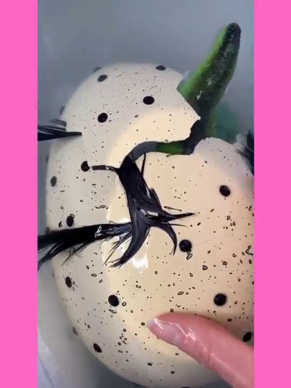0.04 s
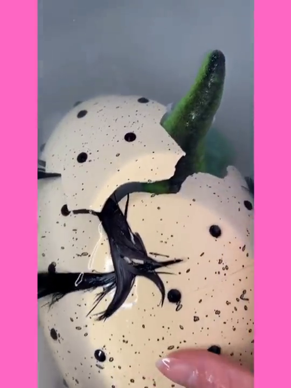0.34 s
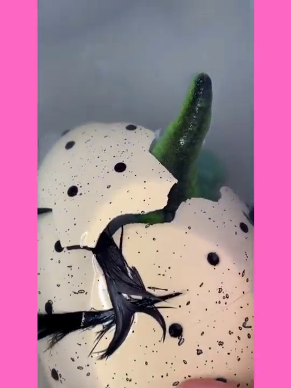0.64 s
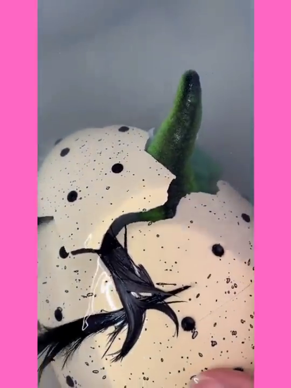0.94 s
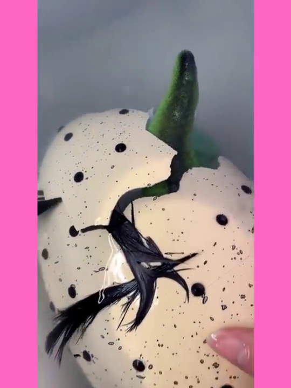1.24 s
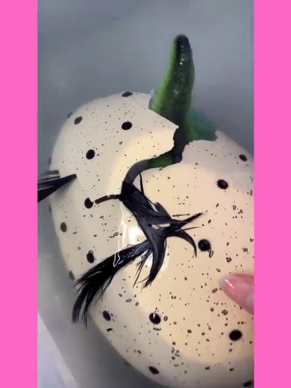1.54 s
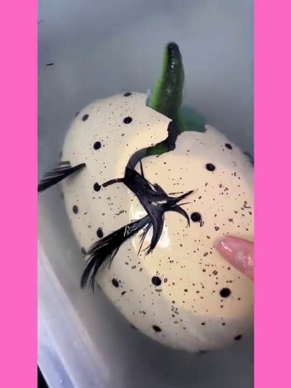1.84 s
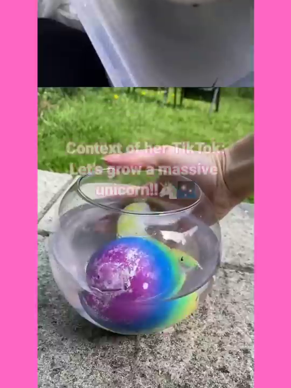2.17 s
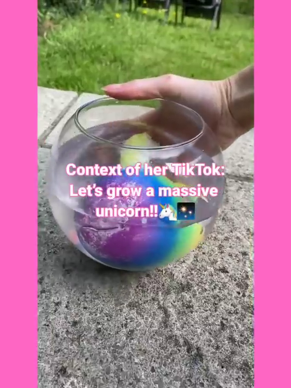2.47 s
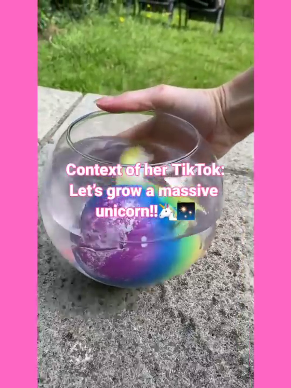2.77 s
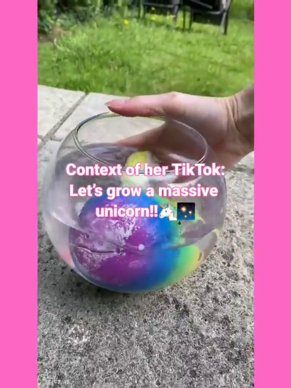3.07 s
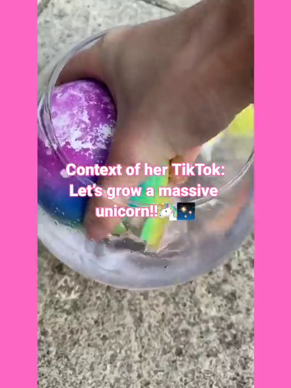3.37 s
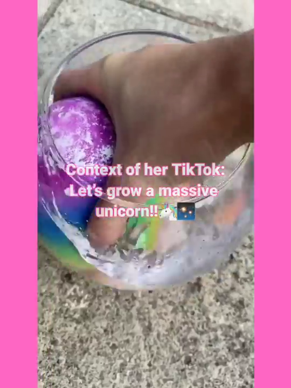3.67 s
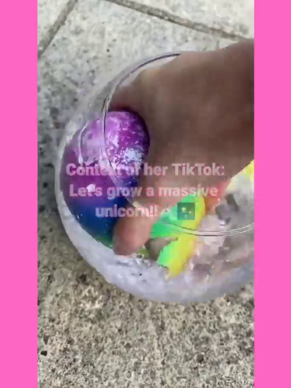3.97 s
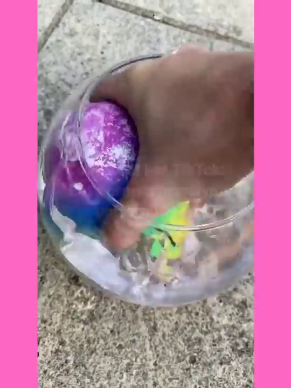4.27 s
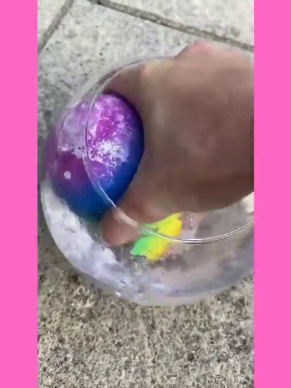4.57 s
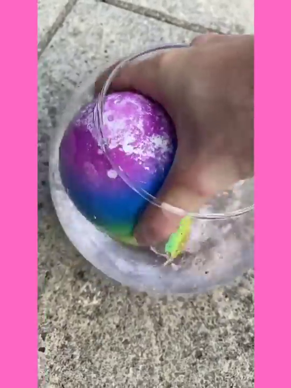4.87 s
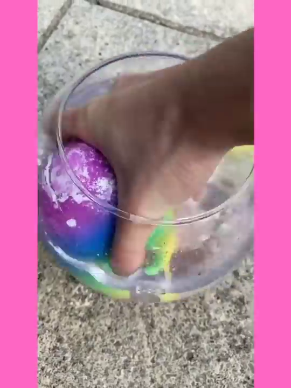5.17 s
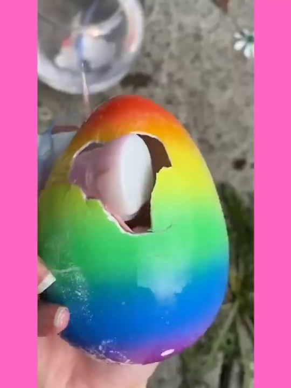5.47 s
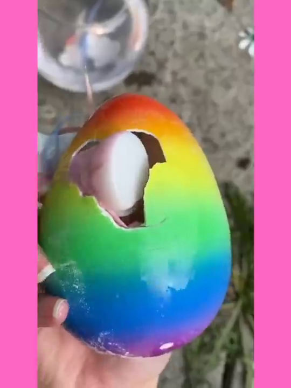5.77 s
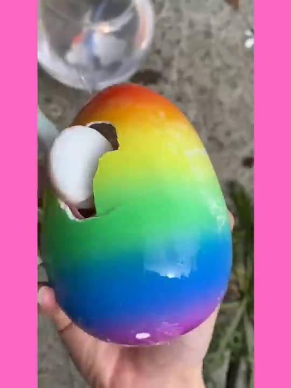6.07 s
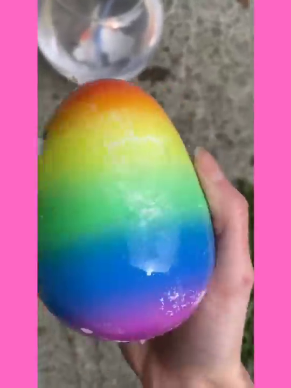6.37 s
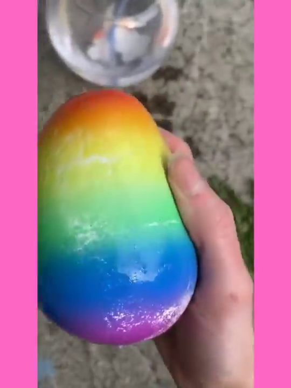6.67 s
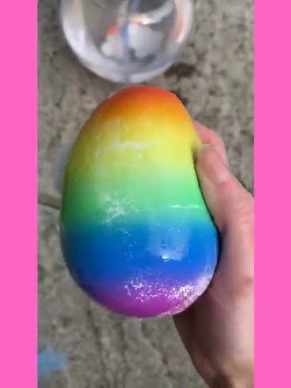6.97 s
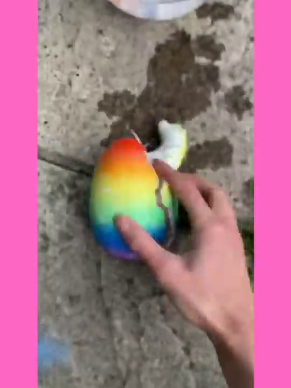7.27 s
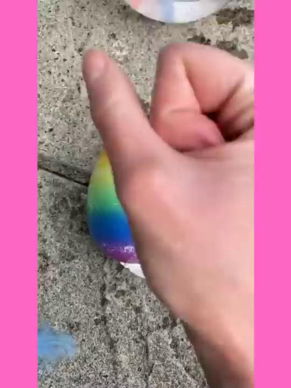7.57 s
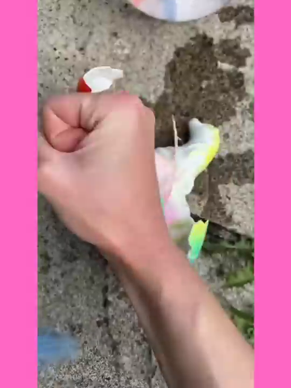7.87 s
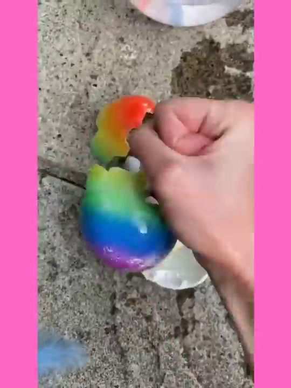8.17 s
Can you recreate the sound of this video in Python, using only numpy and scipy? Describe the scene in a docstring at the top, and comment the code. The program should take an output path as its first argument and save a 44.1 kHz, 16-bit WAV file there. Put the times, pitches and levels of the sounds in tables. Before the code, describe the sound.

Fingertips tap lightly on a big soaking toy egg in a quiet room. Outdoors, a glass bowl scrapes and judders over gritty paving. Close to the microphone, a hand crushes an egg underwater in the bowl, with sharp cracks, sloshing, bubbles and little spurts. Out of the water, the hollow shell gives scattered dry cracks, then is smashed three times on the slabs, its pieces rustling. Light wind rumbles on the microphone.

```python
"""Toy eggs are opened by hand. First, fingertips tap a big soaking egg in a quiet room. From 2.15 s, outdoors
in light wind, a glass bowl sticks and slips over gritty paving. From 3.1 s an egg is crushed under water in the
bowl: fractures ring the air inside the egg, water and air spurt through the cracks, the water sloshes and
bubbles ring. From 5.7 s the hollow shell cracks as it is squeezed in the air. At 7.33 s the whole egg lands on
the slabs, then it is smashed twice, each impact trailed by a short grainy wash."""
import sys
import numpy as np
from scipy import signal
from scipy.fft import rfft, irfft, next_fast_len
from scipy.io import wavfile
from scipy.ndimage import uniform_filter1d

SR = 44100
rng = np.random.default_rng(int(sys.argv[2]) if len(sys.argv) > 2 else 0)


def digitize_waveform(pressure):
    """Quantize a signal to 16-bit integers and store it at the path in sys.argv[1].

    Rows of a 2-D input are taken as channels; values are limited to [-1, 1].
    """
    field = np.atleast_2d(pressure).T
    bounded = np.clip(field, -1, 1)
    quanta = np.round(bounded * 32767).astype(np.int16)
    wavfile.write(sys.argv[1], SR, quanta)


N = 370881
TIME_S = np.arange(N) / SR
HIT_S = TIME_S[:SR // 6]  # time axis of one short event
OUTDOORS_S, HAND_IN_S, LIFTED_S = 2.15, 3.38, 5.53


def cracks(rows, modes, spectrum, scatter, rise_s, crumbs_db, crumbs_s, fade_in_db, ripple_db,
           body=lambda x: x):
    """Each crack fades in briefly, peaks and dies away; the sudden release rings the hollow shell."""
    out, lead_s, fade_in_s = np.zeros(N), .008, .0018
    t = HIT_S - lead_s
    for s, snap_db, ring_db, tear_s, *pitch_hz in rows:
        before = gain_of(fade_in_db) * np.exp(-abs(t) / fade_in_s)
        after = np.exp(-abs(t) / max(tear_s, .0005)) + gain_of(crumbs_db) * np.exp(-abs(t) / crumbs_s)
        slips = grains(9000, 5.6, len(t)) * np.where(t < 0, before, after)
        push = scatter * slips / np.linalg.norm(slips)
        push[round(lead_s * SR)] += 1
        tuning = pitch_hz[0] / modes[0][0] if pitch_hz else 1
        shell = sum(gain_of(db - 60 * HIT_S / t60_s)
                    * np.sin(2 * np.pi * hz * tuning * rng.uniform(0.97, 1.02) * HIT_S)
                    for hz, db, t60_s in modes)
        ring = signal.fftconvolve(push, shell * attack(rise_s))[:len(t)]
        snap = body(colour(slips, spectrum, ripple_db))
        add(out, s - lead_s, sized(snap, snap_db) + sized(ring, ring_db))
    return out


# Breaks under water (time [s], snap [dB], ring [dB], tear [s], pitch [Hz])
WET_CRACKS = [(3.121, -32.5, -52, 0.016, 730), (3.427, -35.5, -34, 0.0037, 730),
              (3.454, -19.5, -27, 0.0061, 729), (3.577, -22, -22.5, 0.012, 765),
              (3.641, -25.5, -48, 0.0027, 736), (3.684, -21, -11, 0.0034, 698),
              (3.922, -22, -23.5, 0.0024, 724), (3.957, -20.5, -26, 0.0011, 730),
              (4.072, -15.5, -23.5, 0.0063, 750), (4.115, -12, -21, 0.005, 770),
              (4.163, -28, -13, 0.0034, 756), (4.269, -26, -25.5, 0.0016, 719),
              (4.323, -12.5, -32.5, 0.0086, 744), (4.351, -17.5, -26.5, 0.016, 716),
              (4.421, -25, -4.5, 0.006, 722), (4.57, -24, -16, 0.0026, 732), (4.62, -17, -29, 0.0038, 746),
              (4.671, -40.5, -20, 0.011, 680), (4.759, -19, -19.5, 0.0039, 690),
              (4.816, -28.5, -42.5, 0.005, 726), (5.093, -31.5, -33, 0.0039, 743),
              (5.204, -46, -23, 0.0073, 789), (5.267, -19.5, -32, 0.003, 730),
              (5.426, -17, -21.5, 0.01, 732), (5.466, -28.5, -39.5, 0.0066, 730)]
# Hand squeezes (time [s], length [s], level [dB])
SQUEEZES = [(3.562, 0.21, -33.5), (3.864, 0.057, -26.5), (3.97, 0.043, -48), (4.059, 0.15, -34.5),
            (4.304, 0.063, -27), (4.368, .11, -34.5), (4.514, 0.14, -31.5), (4.666, 0.18, -42.5),
            (5.17, 0.07, -35), (5.434, 0.025, -44)]
# Modes of the air inside the submerged egg (frequency [Hz], level [dB], t60 [s])
WET_MODES = [(720, 9.5, 0.043), (1120, -2, 0.036), (1530, -10.5, 0.024), (1890, -13.5, 0.028)]
# Wet snap spectrum (frequency [Hz], level [dB])
WET_SNAP = [(600, -6), (1500, -6.5), (2300, -2), (2950, -6.5), (3800, 5), (4400, 4.5), (4950, -3),
            (5600, 2), (7500, 4.5), (11000, 0), (13000, -3.5), (14000, -26.5)]


def wet_cracking(splinters_per_s=35, splinter_s=0.0021, spread_db=6):
    """The shell breaks under water in the bowl; squeezes add lesser splinters."""
    rows = list(WET_CRACKS)
    for s, length_s, db in SQUEEZES:
        for place, snap, ring in rng.uniform(-0.91, 1, (12, 3))[:round(length_s * splinters_per_s)]:
            at_s = s + SURGE_S / 2 + length_s * (place + 1) / 2
            snap_db = db - 2.5 + spread_db * snap
            ring_db = db - 6.5 + spread_db * ring
            rows.append((at_s, snap_db, ring_db, splinter_s, WET_MODES[0][0]))
    return cracks(rows, WET_MODES, WET_SNAP, scatter=0.99, rise_s=0.00012, crumbs_db=-47.5,
                  crumbs_s=0.0167, fade_in_db=-1, ripple_db=5.5, body=glass)


# Breaks in the air (time [s], snap [dB], ring [dB])
DRY_CRACKS = [(3.276, -32, -26.5), (3.285, -30.5, -24), (3.782, -29.5, -20.5), (5.722, -58, -35.5),
              (5.782, -25.5, -15), (6.06, -28, -34), (6.093, -36, -30.5), (6.326, -37.5, -28),
              (6.38, -25, -14.5), (6.54, -32, -32.5), (6.816, -40, -31.5), (6.835, -32.5, -36),
              (6.841, -31, -22), (6.99, -33, -30.5)]
# Shell modes in the air (frequency [Hz], level [dB], t60 [s])
DRY_MODES = [(1018, 14.5, 0.019), (1395, 3, 0.016), (2110, -7.5, 0.014), (2620, -3, 0.017),
             (3480, -3, 0.018), (4350, -8.5, 0.014)]
# Dry snap spectrum (frequency [Hz], level [dB])
DRY_SNAP = [(300, -0.5), (1500, 2), (2450, -1), (3300, -2), (4300, -1), (4900, -10.5), (5500, -3.5),
            (7200, -13), (8500, -16.5), (12000, -32.5), (14000, -36)]


def dry_cracking(clean_db=-22.5, clean_s=0.0027):
    """Clear of the water, strong cracks break cleanly and weak ones tear slowly."""
    rows = [(s, snap_db, ring_db, clean_s * gain_of(0.25 * (clean_db - ring_db)))
            for s, snap_db, ring_db in DRY_CRACKS]
    return cracks(rows, DRY_MODES, DRY_SNAP, scatter=0.46, rise_s=0.002, crumbs_db=-27.5,
                  crumbs_s=0.022, fade_in_db=-14.5, ripple_db=2.5)


# Breaks and rebounds as the egg lands and under two blows (time [s], snap [dB], ring [dB], tear [s], pitch
# [Hz])
SMASHES = [(7.333, -15.5, -7.5, 0.006, 1173), (7.345, -24, -20, 0.0018, 1144),
           (7.835, -30.5, -24, 0.0031, 1270), (7.842, -24, -20.5, .002, 1230),
           (7.851, -26, -7.5, 0.0066, 1258), (7.861, -25.5, -21, 0.00257, 1120),
           (8.138, -39, -25, 0.00356, 1450), (8.15, -20, -14, 0.0014, 1406),
           (8.157, -32.5, -21, .003, 1320), (8.174, -33, -28, 0.0056, 1240),
           (8.189, -35.5, -31.5, 0.0027, 1050)]
# Light knocks and short echoes around the smashes (time [s], snap [dB], ring [dB], pitch [Hz])
KNOCKS = [(7.258, -35.5, -55, 1310), (7.364, -35.5, -26.5, 1050), (7.422, -48, -34, 1170),
          (7.697, -29.5, -33.5, 2290), (7.704, -34, -34, 2180), (7.916, -55, -40, 2120),
          (8.028, -39, -34.5, 734), (8.035, -39, -55, 750), (8.081, -55, -32, 990)]
# Modes of the hollow shell and of its shards (frequency [Hz], level [dB], t60 [s])
WHOLE_MODES = [(1170, 2.5, 0.049), (1490, 3, 0.0113), (2207, 7.5, 0.018), (2376, 5.5, 0.014),
               (3070, -3, 0.014), (3360, -4, 0.019)]
SHARD_MODES = [(1210, 2.5, 0.027), (850, 1.5, 0.0075), (1422, 12, 0.012), (1790, 14, 0.0045),
               (2134, -0.5, 0.022), (2400, -5, 0.018)]
# Smash snap spectrum (frequency [Hz], level [dB])
SMASH_SNAP = [(200, 8.5), (1200, -3.5), (2600, -1), (3700, 4.5), (4900, -2.5), (6000, 0), (8000, -6.5),
              (12500, -17.5), (14000, -20.5)]


def smashing(knock_s=0.0027):
    """The egg landing whole rings the hollow shell; later blows and light knocks ring with the shard modes."""
    whole = cracks(SMASHES[:2], WHOLE_MODES, SMASH_SNAP, scatter=1, rise_s=0.00025, crumbs_db=-24.5,
                   crumbs_s=0.025, fade_in_db=-15, ripple_db=4.5)
    knocks = [(s, snap_db, ring_db, knock_s, hz) for s, snap_db, ring_db, hz in KNOCKS]
    shards = cracks(SMASHES[2:] + knocks, SHARD_MODES, SMASH_SNAP, scatter=0.87, rise_s=0.00025,
                    crumbs_db=-13, crumbs_s=0.014, fade_in_db=-6, ripple_db=4)
    return whole + shards


# Wash spectrum (frequency [Hz], level [dB])
WASH = [(300, 9), (1200, 5.5), (2600, -1), (4800, -3), (6500, -2), (9000, -7.5), (11000, -31), (14000, -33)]
# Pieces shifting on the paving (time [s], level [dB], length [s], centre [Hz])
RUSTLES = [(7.42, -41.5, .08, 6460), (7.42, -39, 0.052, 1210), (7.537, -49, 0.0028, 8400),
           (8.2, -36.5, 0.057, 2320), (8.31, -39, 0.11, 2700)]
# Rustle spectrum (frequency [x centre], level [dB])
RUSTLE_SHAPE = [(.2, -9), (.6, -2.5), (1.1, 1), (1.7, -10), (3, -34)]


def smash_tails(wash_db=-16.5, decay_s=0.051):
    """A dense, grainy wash dies away quickly after each smash; broken pieces slide and rustle on."""
    power = sum(gain_of(2 * snap_db) * (TIME_S > s) * np.exp(-abs(TIME_S - s) * 2 / decay_s)
                for s, snap_db, *_ in SMASHES)
    wash = crackle(WASH, per_s=6500, clump_db=8.5, clump_hz=45, ripple_db=5.5)
    rustles = bursts(RUSTLES, RUSTLE_SHAPE, per_s=2500, spread_db=2.5, clump_db=3.5, ripple_db=2.5,
                     rise_s=.004, fade_s=0.012)
    return gain_of(wash_db) * np.sqrt(power) * wash + rustles


SURGE_S, SETTLE_S, LAPPING_DB = 0.016, 0.033, -45
# Spray spectrum (frequency [Hz], level [dB])
SLOSH = [(250, 11.5), (480, 12.5), (740, -1), (950, -22.5), (1150, -16), (1900, -17), (2350, -6),
         (3000, -14.5), (4400, -12.5), (7500, -11), (9500, -14), (12500, -22), (14000, -30.5)]


def sloshing(spray_db=-0.5, fizz_db=-11, bubbles_per_s=850):
    """Spray and small bubbles surge with each squeeze, then settle to a gentle lapping."""
    surges = sum(gain_of(db) * np.clip((TIME_S - s) / SURGE_S, 0, 1)
                 * np.exp(-np.maximum(TIME_S - s - length_s, 0) / SETTLE_S)
                 for s, length_s, db in SQUEEZES)
    stirring = (surges + gain_of(LAPPING_DB)) * envelope([(HAND_IN_S, 0), (LIFTED_S, 0)])
    spray = glass(crackle(SLOSH, per_s=3000, clump_db=28.5, clump_hz=34.5, ripple_db=8.5, spots=8))
    pitches_hz = np.geomspace(640, 6000, num=24) * rng.uniform(.95, 1.05, 24)
    fizz = np.zeros(N)
    for hz in pitches_hz:
        births = grains(bubbles_per_s / len(pitches_hz), 3.3)
        fizz += signal.oaconvolve(births, bubble(hz, t60_s=0.047 * (1000 / hz) ** .5, glide=0.015))[:N]
    return stirring * (gain_of(spray_db) * unit_rms(spray) + gain_of(fizz_db) * unit_rms(fizz))


def bubble(hz, t60_s, glide):
    """A pocket of air rings and rises in pitch as it nears the surface."""
    return sweep(hz * (1 + glide * HIT_S / t60_s)) * gain_of(-60 * HIT_S / t60_s) * attack(0.00073)


# Large air bubbles (time [s], level [dB], pitch [Hz])
BUBBLES = [(3.608, -5, 466), (3.721, -18.5, 1665), (3.742, -14, 720), (3.852, -14, 2400),
           (3.877, -16.5, 700), (3.9, -15.5, 755), (3.935, -9.5, 697), (4.023, -20, 2300),
           (4.06, -20.5, 2420), (4.089, -18.5, 1120), (4.106, -8.5, 2640), (4.165, -7, 334),
           (4.335, -10.5, 1556), (4.353, -12.5, 1134), (4.353, -12, 430), (4.425, -11, 1120),
           (4.461, -23.5, 2410), (4.568, -10, 390), (4.622, -16, 1120), (4.671, -7, 696),
           (4.672, -11.5, 1005), (4.758, -9.5, 406), (4.87, -15, 1162), (5.204, -13, 720),
           (5.212, -11, 416)]


def large_bubbles():
    """Each large bubble rings while the water around it churns."""
    out = np.zeros(N)
    for s, db, hz in BUBBLES:
        churn = slow_noise(0.2 * hz, len(HIT_S)) * np.sin(2 * np.pi * hz * HIT_S)
        churn *= attack(0.0017) * np.exp(-HIT_S / 0.0085)
        add(out, s, gain_of(db) * (0.87 * bubble(hz, t60_s=0.033, glide=0.016) + 0.36 * churn))
    return out


# Jets from the shell (time [s], level [dB], length [s], centre [Hz])
SPURTS = [(3.294, -32.5, .014, 10400), (3.596, -22.5, .012, 9000), (3.72, -33.5, 0.012, 7060),
          (4.058, -34, .004, 7000), (4.2, -29, .035, 5530), (4.504, -38, .003, 10600),
          (4.517, -29.5, .006, 6500), (4.533, -31, 0.0045, 7250), (4.55, -29.5, 0.0043, 7910),
          (4.605, -32, .004, 10000), (4.745, -30.5, 0.0065, 4860), (4.976, -37.5, .006, 5570),
          (5.176, -33, 0.0252, 8050), (5.238, -36, 0.0021, 7080)]
# Jet spectrum (frequency [x centre], level [dB])
SPURT_SHAPE = [(.15, -23), (.55, -7.5), (1, -1), (1.4, -13), (2.2, -20.5)]


def spurting():
    """Water and air spurt through the cracks."""
    return bursts(SPURTS, SPURT_SHAPE, per_s=6400, spread_db=5, clump_db=6, ripple_db=6.5,
                  rise_s=0.0013, fade_s=0.0018)


# Ringing tones of the water and air between egg, hand and glass (frequency [Hz], width [Hz], gain [dB])
HOLLOW_TONES = [(1135, 24, 4), (1508, 22, 9), (1864, 14, 4.5), (2196, 25, 1.5), (2366, 28, 5.5),
                (3670, 69, 4)]


def hollow_ringing(x):
    """The water and air held between egg, hand and glass ring."""
    return resonate(x, HOLLOW_TONES)


# Pull on the bowl (time [s], effort [dB])
DRAG = [(2.15, -44.5), (2.19, -25.5), (2.212, -43), (2.348, -27), (2.398, -36.5), (2.426, -18),
        (2.756, -25.5), (2.93, -23), (3.0, -51.5)]
# Coarse grit crushed (time [s], level [dB], length [s])
GRIT = [(2.184, -26.5, 0.01), (2.24, -25, 0.022), (2.312, -26.5, 0.015), (2.35, -35.5, 0.0043),
        (2.39, -28, 0.007), (2.456, -23, 0.0074), (2.468, -20, 0.0077), (2.481, -17, .01),
        (2.515, -18, 0.013), (2.536, -17, 0.01), (2.571, -9, 0.027), (2.62, -23.5, 0.012),
        (2.725, -13, 0.028), (2.814, -16.5, 0.016), (2.852, -21, 0.008), (2.872, -14, 0.0074),
        (2.899, -14.5, .016)]
# Grinding and juddering spectra (frequency [Hz], level [dB])
GRIND = [(290, -21), (500, -2.5), (606, -12.5), (810, 7), (1160, -4), (1680, -1), (1880, -11), (2920, -12),
         (3690, -12), (3960, -1.5), (4600, -11.5), (5980, -2), (8220, -6.5), (10500, -6.5), (12900, -13),
         (13700, -27.5)]
JUDDER = [(29, -43), (50, -16), (86, -11.5), (151, -1.5), (228, 0.5), (328, -0.5), (440, -19), (600, -29),
          (1100, -79.5)]


def bowl_drag(grind_db=-12.5, judder_db=1, bite_s=0.002, crush_s=0.009):
    """Glass sticks and slips on sand grains, and the heavy bowl judders with the slips."""
    slipping, effort = slow_noise(47), envelope(DRAG)
    sand = crackle(GRIND, per_s=7000, clump_db=8, clump_hz=39.6, ripple_db=4) * gain_of(2 * slipping)
    out = gain_of(grind_db) * abs(effort) ** 0.81 * unit_rms(glass(sand))
    lead_s = .04
    t = HIT_S - lead_s
    for s, db, length_s in GRIT:
        pressure = np.exp(np.minimum(t, 0) / bite_s - np.maximum(t - length_s, 0) / crush_s)
        crushed = grains(7000, 2.8, len(t)) * pressure * gain_of(2.5 * slow_noise(220, len(t)))
        add(out, s - lead_s, sized(glass(colour(crushed, GRIND, ripple_db=6.5)), db))
    judder = unit_rms(colour(rng.standard_normal(N) * gain_of(2.5 * slipping), JUDDER))
    return out + gain_of(judder_db) * effort * judder


# Bowl resonances (frequency [Hz], width [Hz], gain [dB])
BOWL = [(850, 80, -6), (1680, 47, 6), (4100, 120, 1.5), (5250, 200, 6.5), (5730, 100, 4), (6190, 200, 5),
        (6590, 120, 5.5), (10500, 250, 3)]


def glass(x):
    """The bowl colours whatever sounds in it or against it."""
    return resonate(x, BOWL)


# Fingertip taps (time [s], ring [dB])
TAPS = [(0.05, -38), (0.134, -40.5), (0.278, -32), (0.294, -36), (0.38, -42), (0.503, -33), (0.514, -37.5),
        (0.738, -33.5), (0.751, -37), (0.928, -48), (1.066, -41), (1.074, -34), (1.289, -33), (1.303, -37),
        (1.373, -43), (1.514, -31.5), (1.586, -35.5), (1.712, -32), (1.724, -39), (1.778, -34.5),
        (1.907, -31), (1.916, -36), (2.036, -40), (2.114, -31.5), (2.123, -38.5)]
# Big egg modes (frequency [Hz], level [dB], t60 [s])
EGG_MODES = [(560, 3.5, 0.016), (907, 1, 0.016), (1260, -2.5, 0.013), (1503, -2.5, 0.012),
             (2354, -3.5, 0.0082)]
# Nail tick spectrum (frequency [Hz], level [dB])
TICK = [(1500, -5.5), (2800, -8), (4500, -8.5), (5400, -6), (6800, -10), (7600, -23), (10000, -34.5),
        (14000, -51)]
# A nail just catching the shell (time [s], level [dB], length [s], centre [Hz])
NAIL_GRAZE = (1.401, -57, .001, 5000)


def tapping(firm_db=-32, contact_s=0.00172):
    """Each tap knocks the soaking egg and sets it bobbing; firm taps are brighter and tick more."""
    out = np.zeros(N)
    for s, ring_db in TAPS:
        firmness_db = ring_db - firm_db
        modes = [(hz, db + 0.31 * firmness_db * np.log2(hz / EGG_MODES[0][0]), t60_s)
                 for hz, db, t60_s in EGG_MODES]
        tick_db = -42.5 + 2.45 * firmness_db
        out += cracks([(s, tick_db, ring_db, contact_s)], modes, TICK, scatter=0.83, rise_s=0.0016,
                      crumbs_db=-16, crumbs_s=0.022, fade_in_db=-13, ripple_db=4)
    out += bursts([NAIL_GRAZE], SPURT_SHAPE, per_s=9000, spread_db=6, clump_db=0, ripple_db=6.5,
                  rise_s=.0003, fade_s=.001)
    bobs = [(s + 0.013, 0.23 * ring_db - 26, 185) for s, ring_db in TAPS]
    return out + thuds(bobs, rise_s=0.002, fall=0.074, tail_db=-3.5, tail_s=0.033)


# Soft bumps of hand and egg (time [s], level [dB], pitch [Hz])
BUMPS = [(3.466, -16, 102), (3.625, -6.5, 122.9), (3.705, -10.5, 147.6), (4.29, -12, 133),
         (4.473, -14, 101), (4.972, -15, 84.2), (5.018, -10, 121), (6.054, -19.5, 139.6),
         (6.13, -21.5, 177), (6.304, -17.5, 172.5), (6.322, -17, 58), (6.656, -16.5, 98.2),
         (6.681, -15.5, 117.2), (6.893, -19.5, 128.5), (7.31, -17.5, 166.6), (8.212, -20, 124.3),
         (8.384, -15, 103.5)]


def bumping(heave_hz=222, fist_hz=150):
    """Hand and egg bump, wet cracks shove the water, and the hand's weight lands behind each blow."""
    heaves = [(s, 0.65 * ring_db - 9, heave_hz) for s, _, ring_db, *_ in WET_CRACKS]
    fists = [(s, ring_db - 14, fist_hz) for s, _, ring_db, *_ in SMASHES]
    return thuds(BUMPS + heaves + fists, rise_s=0.0038, fall=0.5, tail_db=-1.5, tail_s=0.0225)


def thuds(rows, rise_s, fall, tail_db, tail_s):
    """A soft push swells, sinks in pitch and leaves a wobble."""
    out = np.zeros(N)
    for s, db, hz in rows:
        tone = sweep(hz * (1 - fall + 2 * fall * np.exp(-HIT_S / 0.0095)))
        push = (HIT_S / rise_s) ** 2 * np.exp(2 - 2 * HIT_S / rise_s) * tone
        wobble = slow_noise(49, len(HIT_S)) * np.sin(2 * np.pi * 0.626 * hz * HIT_S)
        wobble *= attack(rise_s) * np.exp(-HIT_S / tail_s)
        add(out, s, gain_of(db) * (push + gain_of(tail_db) * wobble))
    return out


# Finger slides (time [s], length [s], level [dB], start [Hz], end [Hz])
SLIDES = [(2.917, 0.17, -49, 4220, 4130), (6.569, 0.25, -47.5, 4400, 3440)]


def skin_slides(hiss_width_hz=1200, squeak_width_hz=160):
    """Skin on smooth shell: a squeak in a narrow hiss that sinks as the finger slows."""
    out = np.zeros(N)
    for s, length_s, db, start_hz, end_hz in SLIDES:
        count = int(length_s * SR)
        friction = slow_noise(hiss_width_hz, count) + slow_noise(squeak_width_hz, count)
        squeak = friction * sweep(np.linspace(start_hz, end_hz, count))
        add(out, s, gain_of(db) * unit_rms(squeak * np.hanning(count)))
    return out


# Wind strength (time [s], relative level [dB])
WIND = [(3.0, -37.5), (3.48, -38.5), (3.57, -34), (4.11, -41), (4.45, -30), (5.21, -35.5), (5.73, -45.5),
        (6.77, -37.5), (7.35, -41.5), (7.84, -34.5), (8.41, -35)]
# Room, wind and garden spectra (frequency [Hz], level [dB])
ROOM = [(15, -24.5), (25, 10.5), (120, -1.5), (203, -2.5), (342, -14.5), (1110, -22.5), (1690, -25.5),
        (9500, -36), (13000, -57)]
RUMBLE = [(25, -35), (48, 1), (75, 4.5), (276, -12.5), (400, -20), (700, -89)]
GARDEN = [(180, -18.5), (300, 3), (481, -7), (640, -4.5), (1060, -7.5), (2260, -12.5), (4050, -16),
          (7600, -29), (13000, -54)]


def air(room_db=-56.5, wind_db=-1, gust_db=7.5, garden_db=-53):
    """A quiet room first; outdoors, lumpy wind on the microphone and a faint garden hiss."""
    room = gain_of(room_db) * unit_rms(colour(rng.standard_normal(N), ROOM))
    gusts = colour(rng.standard_normal(N), RUMBLE) * gain_of(gust_db * np.tanh(slow_noise(8)))
    wind = gain_of(wind_db + np.interp(TIME_S, *np.transpose(WIND))) * unit_rms(gusts)
    garden = gain_of(garden_db) * unit_rms(colour(rng.standard_normal(N), GARDEN))
    return np.where(TIME_S < OUTDOORS_S, room, wind + garden)


# Echo decay (frequency [Hz], t60 [s])
ECHO_T60 = [(300, 0.13), (1200, 0.53), (4000, 0.67), (8000, 0.508), (13000, 0.46)]


def echo(x, db):
    """A weak diffuse tail, different in each ear, each band dying at its own speed."""
    hz, t, bands = signal.stft(rng.standard_normal((2, SR // 2)), SR, nperseg=256)
    decay = gain_of(-60 * t / lookup(ECHO_T60, hz)[:, None]) * (t > 0)
    tail = signal.istft(bands * decay, SR, nperseg=256)[1]
    return gain_of(db) * signal.fftconvolve(x[None], tail / np.linalg.norm(tail[0]), axes=1)[:, :N]


# Port balance, far and near sources (frequency [Hz], left over right [dB], phase [rad])
FAR_PORTS = [(100, -3, -.2), (340, -10, -.4), (600, -7, -3.2), (850, 0, -4.6), (1300, -1, -5.7),
             (2150, 0, -6.2), (2800, -2, -4.8), (4100, -1, -5.2), (5400, 0, -6.2), (10000, 0, -3.8),
             (13900, 0, -3)]
NEAR_PORTS = [(100, 0, -.1), (340, -4, -.2), (520, -6, .5), (750, 1, 1.4), (1050, 3, .6), (1900, 0, .1),
              (2800, -2, 1.2), (4300, -1, 1), (5400, 0, .3), (10000, 0, 2.7), (13900, 0, 3.2)]
# Likeness of the ports (frequency [Hz], coherence [0-1])
COHERENCE = [(60, .998), (130, .98), (250, .8), (430, .5), (750, .85), (1800, .86), (3200, .6),
             (13000, .65)]


def ports(x, table):
    """Two microphone ports get their own level and phase; nearby reflections make them partly unlike."""
    size = next_fast_len(N + SR // 4)
    hz, table = np.fft.rfftfreq(size, 1 / SR), np.array(table)
    ratio = gain_of(lookup(table[:, :2], hz))
    phase_rad, coherence = lookup(table[:, ::2], hz), lookup(COHERENCE, hz)
    mid_power = ratio ** 2 + 1 + 2 * coherence * ratio * np.cos(phase_rad)
    direct = ratio ** 2 - 1 + 2j * coherence * ratio * np.sin(phase_rad)
    bounces = rng.standard_normal(len(HIT_S)) * np.exp(-HIT_S / .008)
    scattered = rfft(bounces / np.linalg.norm(bounces), size) * 2 * ratio * np.sqrt(1 - coherence ** 2)
    side = irfft(rfft(x, size) * (direct + scattered) / mid_power, size)[:N]
    return np.array([x + side, x - side])


def bursts(rows, shape, per_s, spread_db, clump_db, ripple_db, rise_s, fade_s):
    """Short runs of grains swell, hold and fade, each around its own centre frequency."""
    out, t = np.zeros(N), TIME_S[:SR // 3]
    for s, db, length_s, hz in rows:
        flow = attack(rise_s, t) * np.exp(-np.maximum(t - length_s, 0) / (fade_s + length_s / 4))
        flow *= gain_of(clump_db * slow_noise(110, len(t)))
        spectrum = [(hz * ratio, ratio_db) for ratio, ratio_db in shape]
        add(out, s, sized(colour(grains(per_s, spread_db, len(t)) * flow, spectrum, ripple_db), db))
    return out


def crackle(spectrum, per_s, clump_db, clump_hz, ripple_db, spots=6):
    """Clumps of grains from several spots, each with its own colour."""
    out = np.zeros(N)
    for _ in range(spots):
        clumps = grains(per_s / spots, 6.34) * gain_of(clump_db * np.tanh(slow_noise(clump_hz) / 2))
        out += colour(clumps, spectrum, ripple_db)
    return unit_rms(out)


def grains(per_s, spread_db, count=N):
    """Random clicks of very unequal size, rms 1."""
    size = gain_of(spread_db * np.minimum(rng.exponential(1, count), 4))
    return unit_rms(size * rng.choice([-1, 1], count) * (rng.random(count) < per_s / SR))


def slow_noise(hz, count=N):
    """Low-passed noise, rms 1."""
    rolloff = 1 + (np.fft.rfftfreq(count, 1 / SR) / hz) ** 4
    return unit_rms(irfft(rfft(rng.standard_normal(count)) / rolloff, count))


def colour(x, spectrum, ripple_db=0, size=4096):
    """Minimum-phase filter; random ripple gives each spot of an object its own resonances."""
    hz = abs(np.fft.fftfreq(size, 1 / SR))
    knots_hz = np.arange(0, SR / 2, 260)
    db = lookup(spectrum, hz) + ripple_db * np.interp(hz, knots_hz, rng.standard_normal(len(knots_hz)))
    log_gain = np.log(gain_of(np.maximum(db, -100)))
    response = np.fft.ifft(np.exp(signal.hilbert(log_gain).conj())).real[:size // 2]
    return signal.fftconvolve(x, response)[:len(x)]


def resonate(x, table):
    """Resonant peaks and dips in series."""
    for hz, width_hz, db in table:
        x = x + (gain_of(db) - 1) * signal.lfilter(*signal.iirpeak(hz, hz / width_hz, SR), x)
    return x


def envelope(rows):
    """A dB curve as a gain over time, silent outside its span."""
    s, db = np.transpose(rows)
    gate = uniform_filter1d(((TIME_S >= s[0]) & (TIME_S <= s[-1])) * 1., size=400)
    return gain_of(np.interp(TIME_S, s, db)) * gate


def lookup(table, hz):
    """Interpolates on a log-frequency axis."""
    knots_hz, values = np.transpose(table)
    return np.interp(np.log(hz + 1), np.log(np.abs(knots_hz) + 1), values)


def sized(x, db):
    """Gives a short sound the energy of 10 ms at this level."""
    return x * gain_of(db) / np.sqrt(np.sum(x ** 2) * 100 / SR + 1e-20)


def add(mix, s, sound):
    part = mix[max(round(s * SR), 0):][:len(sound)]
    part += sound[:len(part)]


def attack(rise_s, t=HIT_S):
    return 1 - np.exp(-t / rise_s)


def sweep(hz):
    return np.sin(2 * np.pi * np.cumsum(hz) / SR)


def unit_rms(x):
    return x / np.sqrt(np.mean(x ** 2) + 1e-20)


def gain_of(db):
    return 10 ** (np.asarray(db) / 20)


def scene():
    """Taps and bowl sound further off; crushing and smashing are close by."""
    indoors = TIME_S < OUTDOORS_S
    in_bowl = ~indoors & (TIME_S < LIFTED_S)
    taps = tapping()
    wet_shell, dry_shell = wet_cracking(), dry_cracking()
    bed = bumping() + air() + skin_slides()
    far = taps + bowl_drag()
    flooded = hollow_ringing(wet_shell + sloshing() + large_bubbles()) + spurting()
    in_air = dry_shell + smashing() + smash_tails()
    near = flooded * in_bowl + in_air
    echoes = echo(far, db=-20) + echo(flooded, db=-23.5) * in_bowl + echo(in_air, db=-24.5)
    return ports(far + bed * indoors, FAR_PORTS) + ports(near + bed * ~indoors, NEAR_PORTS) + echoes


def record(dry):
    """The loudest peaks overload softly; then a 13.6 kHz low-pass."""
    clipped = dry / (1 + dry ** 6) ** (1 / 6)
    lowpass = signal.firwin(161, 13600, window=("kaiser", 8), fs=SR)
    return signal.oaconvolve(clipped, lowpass[None], "same")


dry = scene()
out = record(dry)
digitize_waveform(out)
```